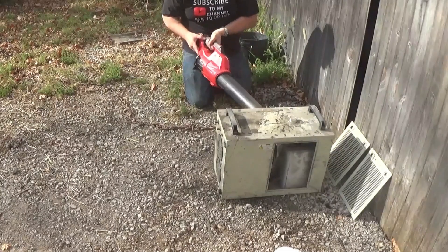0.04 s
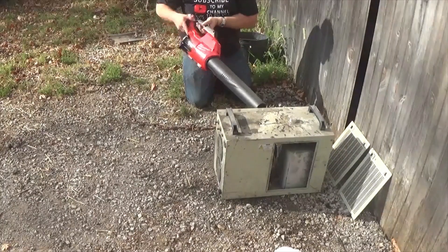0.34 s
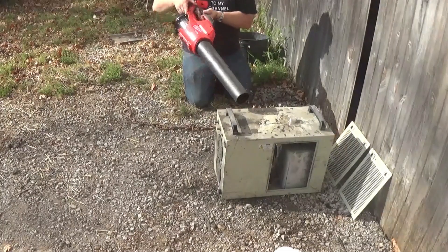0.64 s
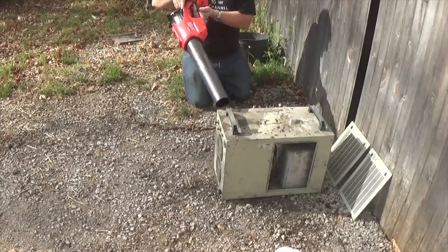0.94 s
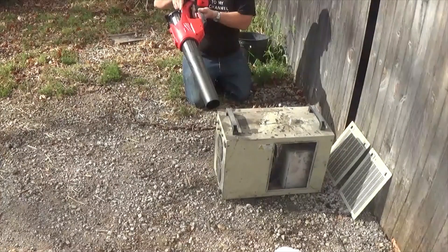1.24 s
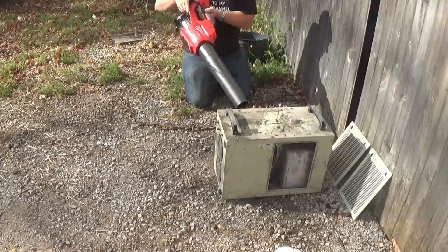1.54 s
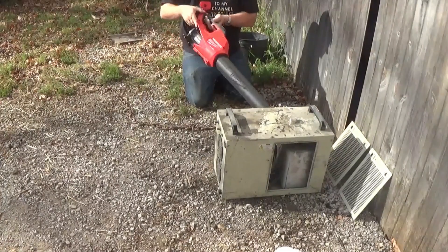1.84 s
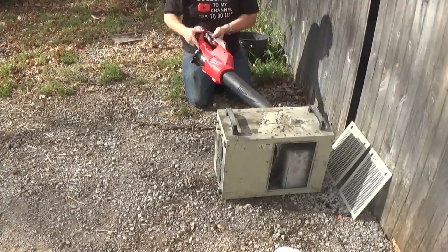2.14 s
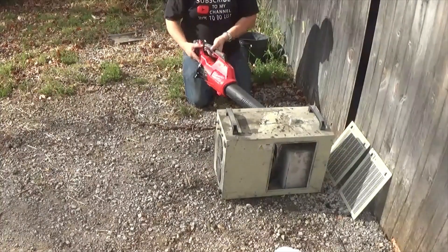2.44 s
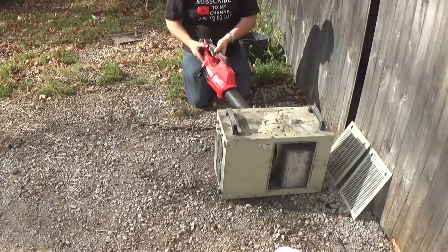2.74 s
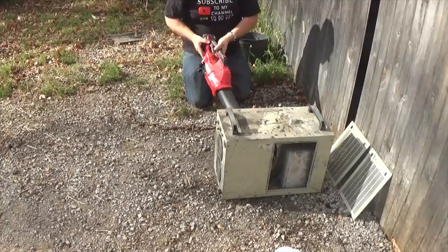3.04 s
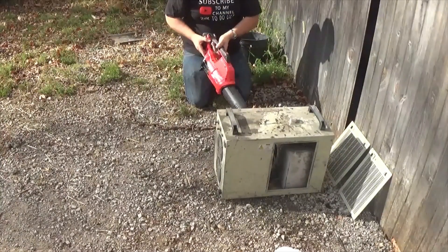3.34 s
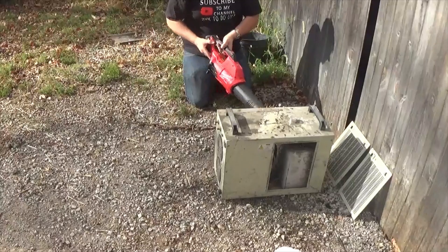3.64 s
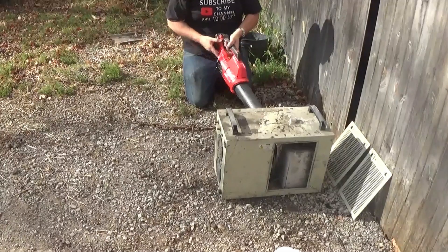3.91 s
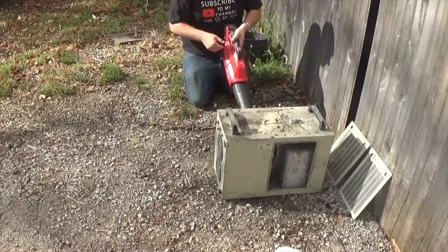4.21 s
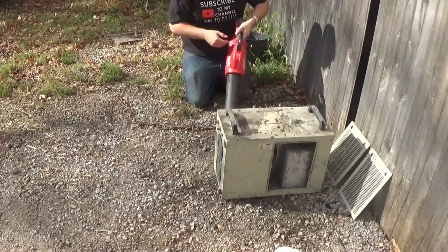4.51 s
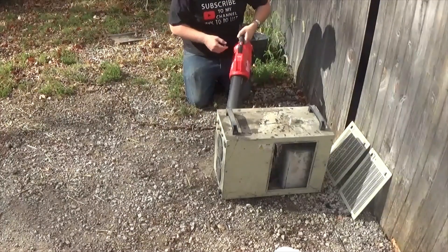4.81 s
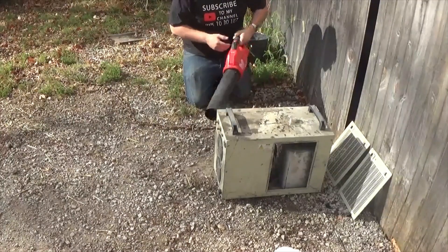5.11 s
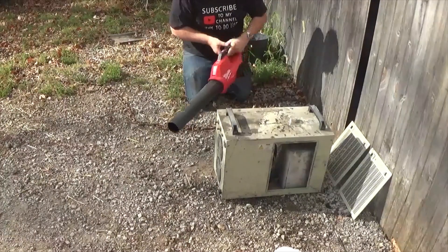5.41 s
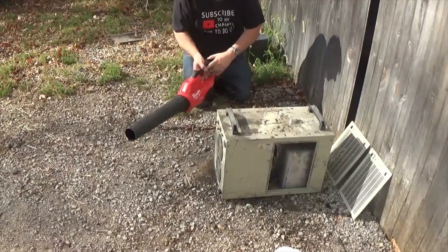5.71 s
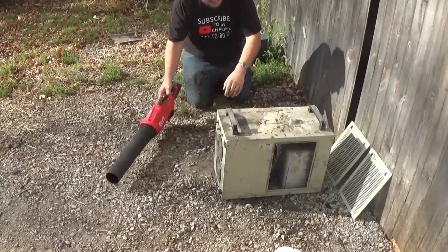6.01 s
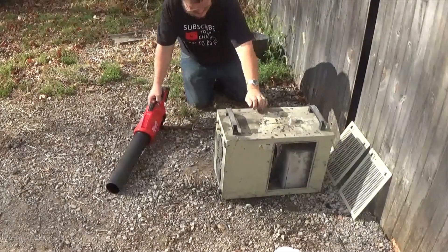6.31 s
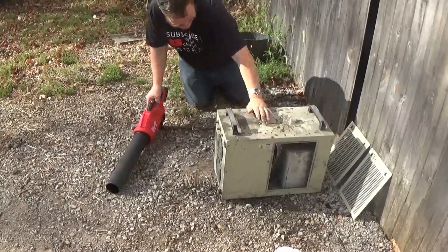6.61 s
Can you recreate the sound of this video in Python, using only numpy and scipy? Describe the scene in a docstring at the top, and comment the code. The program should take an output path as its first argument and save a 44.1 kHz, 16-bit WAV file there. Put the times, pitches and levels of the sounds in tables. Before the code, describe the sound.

A cordless leaf blower whines over rushing air, dips and revs again, then winds down and is set on gravel with a clatter.

```python
"""Gravel beside a wooden fence: a cordless leaf blower is swept over a metal case.
Its six-bladed fan and motor whine over rushing air; the jet roars on the case and its openings hoot.
The trigger is eased, pressed again, then released; the fan coasts down through the tube's resonances.
The blower is set down and a hand slides over the case. Eddies buffet the microphone throughout."""
import sys
import numpy as np
from scipy import signal
from scipy.fft import rfft, irfft, next_fast_len
from scipy.io import wavfile
from scipy.ndimage import uniform_filter1d, map_coordinates

SR = 44100
rng = np.random.default_rng(int(sys.argv[2]) if len(sys.argv) > 2 else 0)


def materialize(psi):
    """Save the field psi as 16-bit PCM at rate SR to the path in sys.argv[1].

    A 1-D psi becomes a single channel; in a 2-D psi each row is a channel.
    """
    bounded = np.clip(np.atleast_2d(psi).T, -1, 1)
    quanta = np.round(bounded * 32767).astype(np.int16)
    wavfile.write(sys.argv[1], SR, quanta)


N = 302526


def shaft():
    """Motor torque works against air drag (speed squared) and friction; returns torque, speed/Hz."""
    # trigger moves, with a restart surge: t/s, torque (1 holds full speed)
    trigger = [(0, 1), (3.905, .45), (3.94, 0), (3.962, .673), (4.111, 0), (4.435, 1.2), (4.462, 2.15),
               (4.504, 1.005), (5.134, 0)]
    # slight wavering of the whine's pitch, running and coasting: t/s, f/Hz per unit share
    speed_scale = [(0, 475.3), (.25, 473.3), (.75, 472.5), (1, 476), (1.5, 474.4), (1.65, 471.5),
                   (1.95, 476.4), (2.3, 473), (3.35, 472.5), (3.6, 470.3), (3.8, 476.3), (4, 474),
                   (5.2, 474), (5.6, 470), (5.95, 472), (6.15, 483), (6.3, 476), (6.86, 471)]
    drag_per_s, friction_per_s, step_s = 3.075, .0597, .001
    move_s, setting = np.transpose(trigger)
    grid_s = np.arange(0, N / SR, step_s)
    torque = setting[np.searchsorted(move_s, grid_s, side="right") - 1]
    share = [1]  # of full speed
    for push in torque[:-1]:
        drive = push * (drag_per_s + friction_per_s)
        share.append(share[-1] + step_s * (drive - drag_per_s * share[-1] ** 2 - friction_per_s))
    torque, share = curves(np.transpose([grid_s, uniform_filter1d(torque, size=20), share]))
    return torque, share * curves(speed_scale)[0]


def blade_whine(shaft_hz):
    """Blade-passing tone and overtones ring the tube; they beam, so vary as the blower turns."""
    # tube resonances: f/Hz, width/Hz, gain/dB
    tube = [(356, 55, 0.5), (520, 100, 3), (791, 85, 3.5), (973, 68, -6.5), (1252.5, 60, 14), (1550, 91, 4),
            (2490, 126, -9), (2878, 150, -11), (5250, 3000, -5.5), (8500, 4600, -4.5)]
    # beaming of the blade tone: t/s, gain/dB
    beam = [(0, -11.5), (.38, -15), (.47, -22), (.85, -29), (1.05, -17.5), (1.35, -26.5), (1.52, -17),
            (1.68, -25), (1.85, -12), (2.02, -21.5), (2.14, -14), (2.3, -17.5), (2.55, -14.5), (2.75, -20),
            (3.25, -12), (3.55, -19), (3.92, -16.5), (4.04, -6.5), (4.16, -24), (4.25, -11), (4.32, -16.5),
            (4.41, -13), (4.45, -22), (4.52, -24), (4.75, -16), (5.12, -17.5), (5.21, -14), (5.3, -25),
            (5.55, -20), (6.86, -19.5)]
    # blade overtones: shaft order, gain/dB
    orders = [(12, 1.5), (18, -1), (24, -6)]
    # overtone envelope: t/s, gain/dB
    envelope = [(0, -31), (.5, -29), (1.2, -29.5), (1.9, -34.5), (3.8, -31), (4.4, -35.5), (5.1, -29.5),
                (5.25, -37), (5.75, -50), (5.92, -31.5), (6.05, -46), (6.16, -38), (6.3, -46),
                (6.58, -46.5), (6.86, -44)]
    tone_db = curves(beam)[0] + 0.98 * speed_db(shaft_hz)
    tone = partials(shaft_hz, [(6, 0)], tube, flutter=0.26, spread=0.17, fade_db=1.13)
    overtones = partials(shaft_hz, orders, tube, flutter=0.74, spread=0.18, fade_db=3, flutter_hz=89.6)
    return amp(tone_db) * tone + amp(curves(envelope)[0]) * overtones


def motor_whine(torque, shaft_hz):
    """Pole tone and rotor whirr ring the housing; both rise under load."""
    # housing resonances: f/Hz, width/Hz, gain/dB
    housing = [(2630, 290, 2), (3300, 430, -0.5), (3790, 290, -6)]
    # pole tone envelope: t/s, gain/dB
    envelope = [(0, -20.5), (.2, -28), (.34, -20), (.46, -32), (1.45, -38), (1.62, -19.5), (1.85, -26),
                (3.3, -21.5), (3.88, -30.5), (3.98, -22), (4.1, -28), (4.68, -23), (4.8, -30), (4.96, -23),
                (5.1, -29), (5.25, -18)]
    # rotor whirr: shaft order, gain/dB
    orders = [(10, 1), (14, -6), (16, -1), (20, -16)]
    # whirr against shaft speed, strongest mid-range: f/Hz, gain/dB
    whirr_by_speed = [(55, -46), (160, -32.5), (220, -41), (275, -25.5), (330, -26), (380, -31), (474, -36)]
    hard_pull_per_s = 0.5
    accel_per_s = np.gradient(shaft_hz) * SR / shaft_hz.max()
    pull = np.tanh(np.maximum(accel_per_s, 0) / hard_pull_per_s)
    coasting = np.clip(1 - 2 * torque, 0, 1)
    surge = np.maximum(torque - 1, 0)
    pole_db = curves(envelope)[0] + 8 * pull - 9.5 * coasting
    whirr_db = along(whirr_by_speed, shaft_hz) + 5 * surge
    pole = partials(shaft_hz, [(8, 0)], housing, flutter=0.47, spread=0.13, fade_db=1)
    whirr = partials(shaft_hz, orders, housing, flutter=1, spread=0.17, fade_db=5)
    return amp(pole_db) * pole + amp(whirr_db) * whirr


def partials(shaft_hz, orders, modes, flutter, spread, fade_db, flutter_hz=55):
    """Shaft-locked tones that flare as they cross a body's resonances."""
    angle = 2 * np.pi * np.cumsum(shaft_hz * (1 + 0.000752 * wobble(12))) / SR
    strain = np.clip(np.gradient(shaft_hz) * SR / 2000, 0, 1)  # hard acceleration: stutter
    depth = flutter * (shaft_hz / shaft_hz.max()) ** 2 + 0.36 * strain
    out = np.zeros((2, N))
    for order, db in orders:
        # uneven inflow smears each tone into a narrow band
        inflow = wobble(flutter_hz) + 1j * wobble(flutter_hz)
        smear = (1 + depth * inflow) / np.sqrt(1 + 2 * depth ** 2)
        # reflections fade and differ left to right as the blower moves
        fade = amp(db + fade_db * wobble(22))
        side = spread * (wobble(1.6) + 1j * wobble(3.3))
        tone = np.sqrt(2) * fade * radiated(modes, order * shaft_hz) * smear * np.exp(1j * order * angle)
        out += np.real(tone * np.array([1 + side, 1 - side]))
    return out


def radiated(modes, hz):
    """Gain of a resonant body at this frequency."""
    return 0.051 + sum(amp(db) / (1 + (2 * (hz - centre) / width) ** 2) for centre, width, db in modes)


def airflow(shaft_hz):
    """The jet roars on the case, the tube rushes, blades and nozzle hiss; all grow with fan speed."""
    # jet on the case: f/Hz, density/dB
    jet_spectrum = [(60, -25), (120, -9), (170, -3), (240, 1.5), (300, -4), (460, -3.5), (560, -7),
                    (780, 1), (1000, -15), (1300, -7), (2000, -11.5), (4000, -57)]
    # tube rush: f/Hz, density/dB
    rush_spectrum = [(200, -29), (450, -20.5), (600, -4), (780, -4), (950, -0.5), (1250, -2.5), (1420, 3),
                     (1650, -1.5), (2000, -0.5), (2480, -2), (2800, -2), (3200, -4), (3800, -7.5),
                     (7000, -32.5)]
    # blade hiss: f/Hz, density/dB
    fan_spectrum = [(1500, -30), (2400, -10), (3200, -1), (3700, -2.5), (4400, 0), (5600, -2), (6300, -8),
                    (7200, -10.5), (10000, -26)]
    # nozzle hiss: f/Hz, density/dB
    hiss_spectrum = [(4000, -36), (6000, 1), (6900, -4), (7600, 3), (8400, 3), (9300, 1), (11000, -7)]
    # how squarely the jet strikes the case: t/s, gain/dB
    aim = [(0, -26), (.32, -29.5), (.5, -35.5), (1.38, -31), (1.7, -23), (2.45, -26), (2.7, -22),
           (2.92, -28.5), (3.3, -26), (3.5, -24), (3.9, -25.5), (4.05, -26), (4.45, -31.5), (4.8, -23.5),
           (4.97, -34.5), (5.3, -42)]
    # how squarely the nozzle faces the microphone: t/s, gain/dB
    facing = [(.33, -28), (.5, -19.5), (1.35, -22), (1.7, -27), (3.2, -29), (3.7, -27), (4.35, -28.5),
              (4.8, -25), (4.97, -25), (5.2, -19), (5.5, -25), (5.8, -30)]
    flow_db = speed_db(shaft_hz)
    jet = amp(curves(aim)[0] + 0.76 * flow_db + 1.04 * wobble(14)) * turbulence(jet_spectrum, 1.5)
    rush = amp(-22 + 1.4 * flow_db + 0.53 * wobble(12)) * turbulence(rush_spectrum, 2.5)
    fan = amp(-20 + 1.83 * flow_db + 0.48 * wobble(15)) * turbulence(fan_spectrum, 2)
    hiss = amp(curves(facing)[0] + 1.75 * flow_db + 0.3 * wobble(15)) * turbulence(hiss_spectrum, 2)
    return ground_echo(jet + rush) + fan + hiss


def ground_echo(x):
    """A short moving echo off the ground hollows the rush while the nozzle is raised."""
    # echo path: t/s, delay/ms, gain
    path = [(.35, 1.6, 0), (.5, 1.72, 0.37), (.9, 1.9, 0.2), (1.25, 2.13, 0.2), (1.5, 1.76, 0.077)]
    delay_ms, gain = curves(path)
    n = np.arange(N)
    late = n - delay_ms * SR / 1000
    return x + gain * np.array([np.interp(late, n, channel) for channel in x])


def case_hoots():
    """The case's openings ring with narrow noise as the jet sweeps past."""
    # jet crossings: t/s, half length/s, f/Hz, width/Hz, level/dB
    crossings = [(.15, 0.27, 403, 80, -37.5), (0.257, 0.11, 710, 110, -30), (0.202, 0.38, 256, 90, -37),
                 (1.79, 0.22, 324, 90, -36.5), (1.968, 0.17, 652, 68.1, -31.5),
                 (2.277, 0.14, 806, 90.6, -25.5), (2.552, 0.31, 1180, 129, -29), (2.7, 0.1, 462, 70.8, -26),
                 (3.478, 0.04, 1117, 80, -25), (3.529, 0.091, 340, 90, -30), (3.578, 0.33, 796, 110, -33),
                 (3.85, 0.11, 440, 69.6, -28), (4.767, 0.2, 400, 89.2, -32.5), (5.21, 0.3, 844, 110, -34)]
    out = np.zeros(N)
    for peak_s, half_s, centre_hz, width_hz, db in crossings:
        band = lambda hz: 1 / (1 + ((hz - centre_hz) / width_hz) ** 2) ** 2
        ring = unit(filtered(rng.standard_normal(N), band))
        out += amp(db) * swell(peak_s, half_s) * ring
    return out


def knocks():
    """The blower bumps the case, later the gravel: its plastic shell rattles and stones crunch."""
    # contacts: t/s, shell drive/dB, grit drive/dB
    contacts = [(4.254, -25, -31), (5.925, -46, -36), (5.982, -52, -40), (6.081, -22.5, -36),
                (6.096, -24, -34), (6.129, -48, -35), (6.191, -25, -29), (6.229, -39, -51),
                (6.388, -44, -38)]
    # shell resonances: f/Hz, width/Hz, gain/dB
    modes = [(290, 200, -3.5), (726, 260, 4), (1420, 340, 2), (1790, 250, 0.5), (2480, 370, -4),
             (3950, 1500, -9.5)]
    # gravel crunch: f/Hz, gain/dB
    grit = [(1500, 4.5), (3000, -4), (6000, 4.5), (8000, -7), (11000, -17)]
    chatter_s, t60_s = .004, 0.054
    t = np.arange(N) / SR
    blows, crunch = np.zeros(N), np.zeros((2, N))
    for start_s, shell_db, grit_db in contacts:
        decay = (t >= start_s) * amp(-60 * np.maximum(t - start_s - chatter_s, 0) / t60_s)
        blows += decay * amp(shell_db) * rng.standard_normal(N)
        crunch += decay * amp(grit_db) * (rng.standard_normal(N) + 0.84 * rng.standard_normal((2, N)))

    def shell(hz):
        """Band-pass modes of alternating sign."""
        return sum((-1) ** k * amp(db) * 1j * hz * width / (centre ** 2 - hz ** 2 + 1j * hz * width)
                   for k, (centre, width, db) in enumerate(modes))

    return amp(16.5) * filtered(blows, shell) + amp(6) * filtered(crunch, lambda hz: amp(along(grit, hz)))


def hand_slide():
    """A palm brushes over the dusty metal."""
    # stroke: t/s, level/dB
    stroke = [(6.64, -75), (6.7, -36.5), (6.76, -32.5), (6.82, -38.5), (6.86, -56)]
    # palm friction: f/Hz, density/dB
    spectrum = [(800, -3), (2500, -2), (4500, 4), (6500, 2), (8500, 3), (11000, -9)]
    return amp(curves(stroke)[0]) * turbulence(spectrum, patchy_db=2.5)


def eddies(breeze_db=-51.5):
    """Stray eddies buffet the microphone over a faint breeze."""
    # gusts: t/s, half length/s, level/dB
    gusts = [(.1, .2, -46), (.98, 0.18, -33.5), (1.528, .026, -24), (1.72, 0.17, -37), (2.85, .25, -49),
             (3.25, 0.18, -39.5), (3.87, 0.061, -43), (4.705, 0.12, -50), (5.046, 0.13, -35),
             (5.476, 0.071, -37.5), (6.036, 0.05, -33.5), (6.263, 0.11, -31.5)]
    # buffeting: f/Hz, density/dB
    spectrum = [(15, -11), (30, -6), (60, 1), (100, -1), (160, -1.5), (300, -15), (800, -53)]
    level = amp(breeze_db) + sum(amp(db) * swell(peak_s, half_s) for peak_s, half_s, db in gusts)
    return level * amp(1.2 * wobble(13)) * turbulence(spectrum, patchy_db=2)


def open_air(level_db=-43):
    """Steady outdoor background, uncovered as the fan slows."""
    # background: f/Hz, density/dB
    spectrum = [(30, 2), (80, 1.5), (160, -4), (260, 3), (500, 0.5), (1200, -4), (2100, -19), (6000, -5),
                (11000, -17.5)]
    return amp(level_db) * turbulence(spectrum, patchy_db=3.5)


def turbulence(spectrum, patchy_db):
    """Stereo noise of rms 1 whose colour shifts in random patches."""
    # left-right likeness: f/Hz, correlation
    likeness = [(50, 0.33), (150, 0.74), (400, .8), (1500, 0.84), (10000, 0.82)]
    bins = signal.stft(rng.standard_normal((2, N)), nperseg=1024)[2]
    patches = uniform_filter1d(rng.standard_normal(bins.shape[1:]), size=7, axis=0)
    patches = uniform_filter1d(patches, size=12, axis=1)
    pair = signal.istft(bins * amp(patchy_db * unit(patches)), nperseg=1024)[1][:, :N]

    def mid_side(hz):
        """The spectrum, split between mid and side."""
        angle = np.arccos(along(likeness, hz)) / 2
        return amp(along(spectrum, hz)) * [np.cos(angle), np.sin(angle)]

    mid, side = filtered(pair, mid_side)
    return unit(np.array([mid + side, mid - side]))


def speed_db(shaft_hz):
    """Shaft speed in dB re its maximum."""
    return 20 * np.log10(shaft_hz / shaft_hz.max())


def amp(db):
    """Decibels to gain."""
    return 10 ** (np.asarray(db) / 20)


def unit(x):
    """Scale to rms 1."""
    return x / np.sqrt(np.mean(x ** 2) + 1e-20)


def along(points, hz):
    """Interpolate (f/Hz, value) points on a log axis."""
    knots_hz, values = np.transpose(points)
    return np.interp(np.log(hz + 1), np.log(knots_hz + 1), values)


def curves(rows):
    """One value per sample for each column after t/s."""
    knots_s, *columns = np.transpose(rows)
    return [np.interp(np.arange(N) / SR, knots_s, column) for column in columns]


def swell(peak_s, half_s):
    """Gaussian envelope of peak 1."""
    return np.exp(-((np.arange(N) / SR - peak_s) / half_s) ** 2)


def wobble(rate_hz):
    """Smooth random curve with knots at this rate."""
    knots = rng.standard_normal(int(N * rate_hz / SR) + 4)
    return map_coordinates(knots, [np.arange(N) * rate_hz / SR])


def filtered(x, response):
    """Apply a frequency response by FFT."""
    size = next_fast_len(N + SR // 2)
    return irfft(rfft(x, size) * response(np.fft.rfftfreq(size, 1 / SR)), size)[..., :N]


def scene():
    """Blower a little to the right; contacts, hand and outdoor air around it."""
    torque, shaft_hz = shaft()
    blower = blade_whine(shaft_hz) + motor_whine(torque, shaft_hz) + airflow(shaft_hz) + case_hoots()
    balance_db = [[-.75], [.7]]
    return blower * amp(balance_db) + eddies() + knocks() + hand_slide() + open_air()


def record(dry):
    """Gain control turns down sound above a ceiling; a band limit follows."""
    ceiling_db, window_s, top_hz = -15, 0.017, 11150
    window = int(window_s * SR)
    power = uniform_filter1d(np.mean(dry ** 2, axis=0), size=window)
    rms = np.sqrt(np.abs(power) + 1e-12)
    gain = uniform_filter1d(np.minimum(amp(ceiling_db) / rms, 1), size=window)
    return filtered(dry * gain, lambda hz: hz < top_hz)


dry = scene()
out = record(dry)
materialize(out)
```